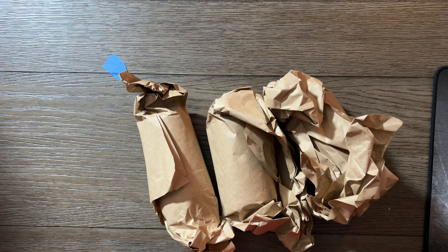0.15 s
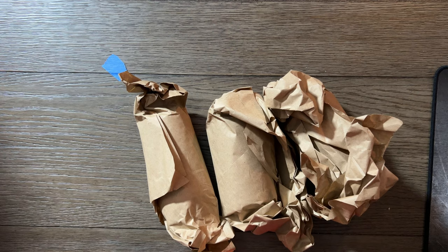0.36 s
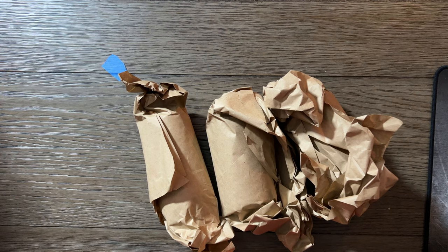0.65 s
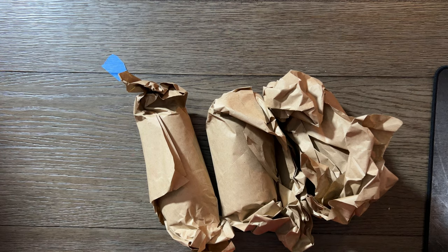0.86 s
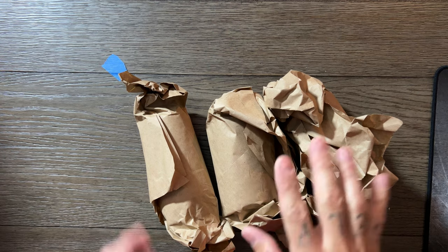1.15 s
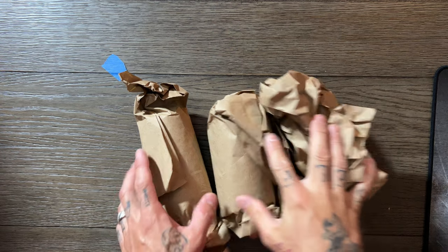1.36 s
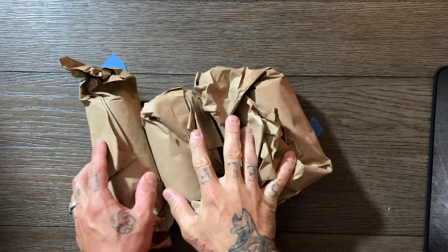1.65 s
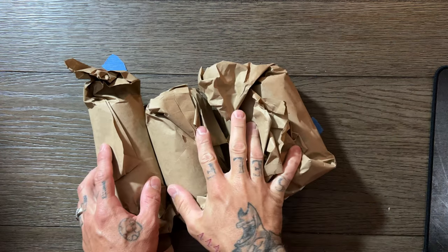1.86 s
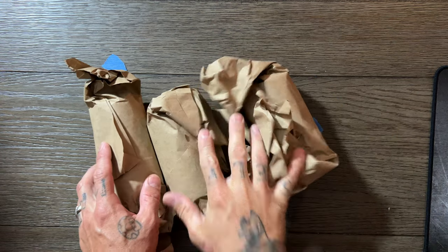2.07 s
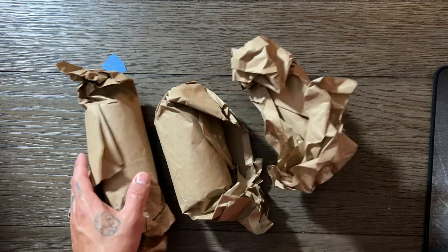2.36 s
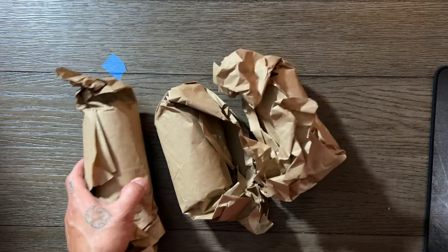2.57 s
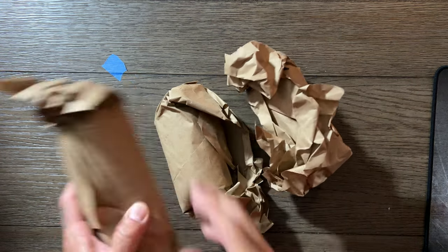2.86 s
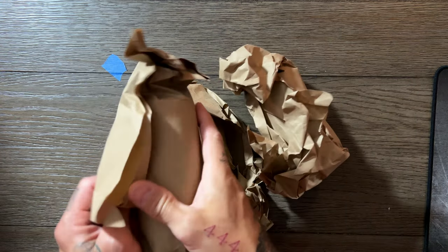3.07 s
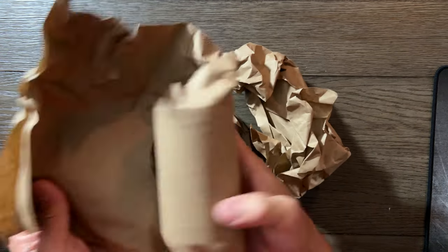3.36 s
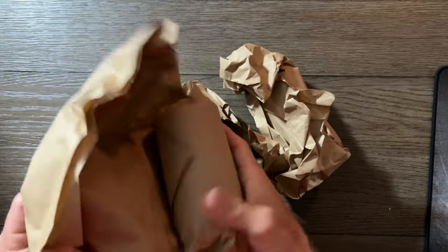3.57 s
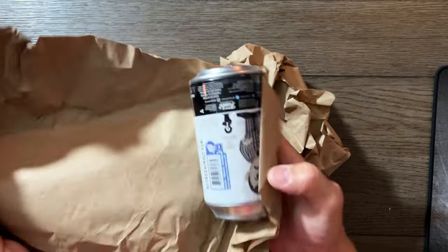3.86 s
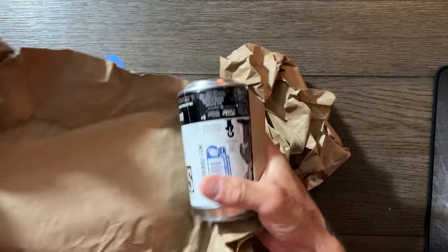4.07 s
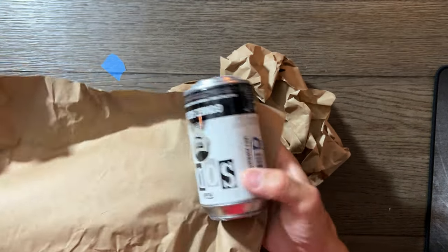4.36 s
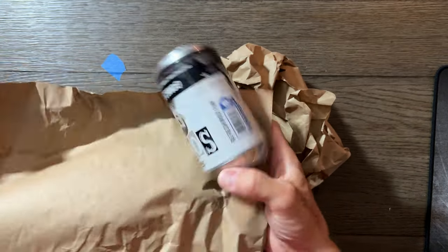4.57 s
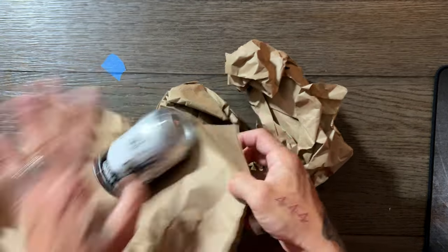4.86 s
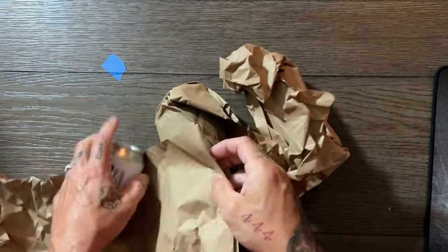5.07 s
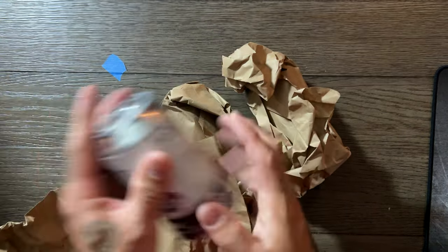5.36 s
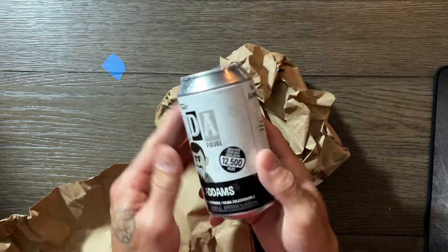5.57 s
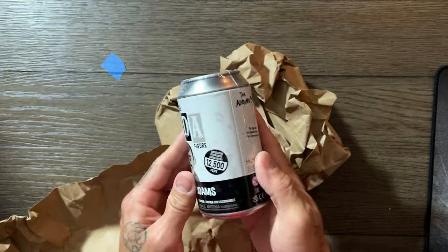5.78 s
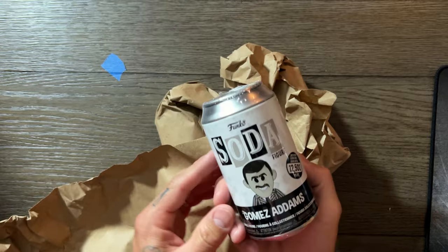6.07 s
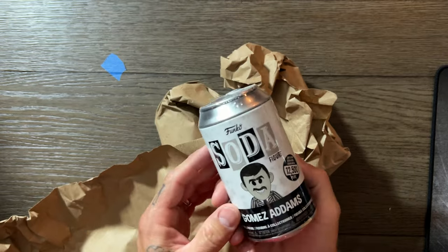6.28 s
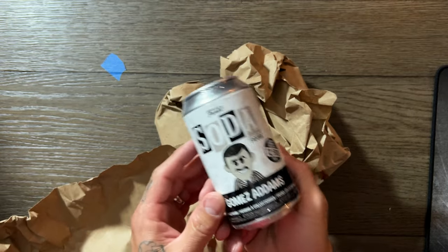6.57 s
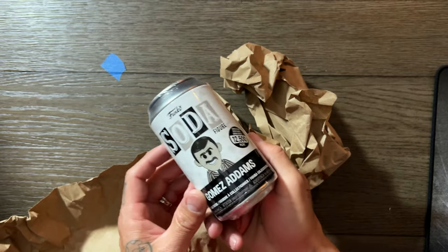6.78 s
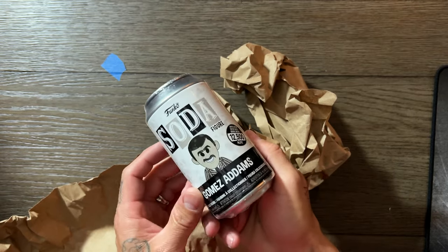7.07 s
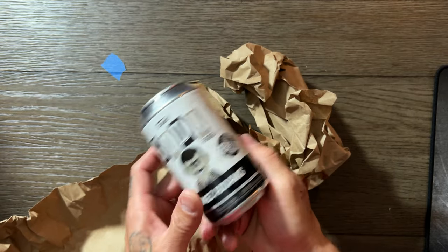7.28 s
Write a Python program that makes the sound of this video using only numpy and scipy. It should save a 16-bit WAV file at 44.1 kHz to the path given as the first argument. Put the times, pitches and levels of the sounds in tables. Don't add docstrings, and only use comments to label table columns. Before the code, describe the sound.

Stiff brown paper parcels slide and rustle on a wooden table, a sheet unrolls with loud crackling, then a tin can thumps down and rattles.

```python
import sys
import numpy as np
from scipy import signal
from scipy.fft import rfft, irfft, next_fast_len
from scipy.io import wavfile
from scipy.ndimage import uniform_filter1d, map_coordinates

SR = 44100
rng = np.random.default_rng(int(sys.argv[2]) if len(sys.argv) > 2 else 0)


def unload_audio(sound):
    columns = np.transpose(np.atleast_2d(sound))
    steps = np.round(np.clip(columns, -1, 1) * 32767)
    wavfile.write(sys.argv[1], SR, steps.astype(np.int16))


def amplitude_ratio(level_db):
    exponent = np.asarray(level_db, float) / 20
    return 10 ** exponent


N = 328104

# start t/s, rise/s, peak level/dB, 20 dB fall/s, flap re peak/dB
SETTLE_STROKES = [
    (-.6, .75, -53, .045, 2),
    (.345, .02, -63, .3, 3),
    (.4, .04, -64, .07, 0),
    (.46, .05, -70, .4, 6),
    (.574, .01, -31, .15, -6),
    (.67, .03, -46, .12, 4),
    (.78, .05, -48, .055, -2),
    (1.038, .008, -45, .13, 6),
    (1.19, .04, -49, .15, -8),
]
# start t/s, rise/s, peak level/dB, 20 dB fall/s, flap re peak/dB
PUSH_STROKES = [(1.297, .008, -41, .2, -12), (1.3, .055, -27.5, .21, -19), (1.39, .05, -35, .15, -19),
                (1.45, .08, -31, .2, -23), (1.55, .09, -33, .07, -22), (1.66, .05, -39, .2, -26),
                (1.72, .06, -39.5, .14, -26), (1.79, .04, -43, .07, -22), (1.87, .02, -50, .05, -2),
                (1.95, .04, -57, .1, 4), (2.05, .08, -39, .28, -18), (2.15, .04, -43, .15, -14),
                (2.245, .09, -45, .04, -14), (2.39, .04, -48, .2, -12), (2.47, .06, -52, .5, -2),
                (2.66, .08, -49, .3, -12), (2.76, .07, -44, .06, -16), (2.86, .08, -46, .1, -14)]
# start t/s, rise/s, peak level/dB, 20 dB fall/s, flap re peak/dB
UNROLL_STROKES = [(2.94, .05, -37, .2, -14), (2.97, .07, -34, .11, -14), (3.12, .07, -41, .3, -16),
                  (3.21, .1, -29.5, .38, -14), (3.5, .17, -42, .3, 5), (3.73, .086, -25, .14, -11),
                  (3.97, .09, -39, .3, -13), (4.12, .1, -29, .135, -13), (4.33, .03, -46, .2, -10),
                  (4.4, .03, -46, .25, -12), (4.5, .06, -46, .3, -12), (4.575, .055, -35, .3, -15),
                  (4.7, .05, -32, .3, -15), (4.795, .022, -27, .05, -14), (4.884, .006, -38, .2, -10),
                  (4.908, .01, -29, .22, -10), (5.02, .055, -42, .1, -8), (5.085, .015, -32, .16, -6),
                  (5.22, .1, -48, .07, -13)]
# start t/s, rise/s, peak level/dB, 20 dB fall/s, dry skin re peak/dB
TURN_STROKES = [(5.435, .05, -47, .08, -7), (5.53, .08, -60, .1, -3), (5.68, .05, -62, .06, 6),
                (5.76, .09, -67, .2, -12), (5.935, .03, -80, .1, 11), (6, .09, -60, .05, -10),
                (6, .03, -73, .25, 7), (6.08, .1, -75, .04, 5), (6.37, .05, -88, .1, 11),
                (6.595, .015, -92, .08, 15), (7.26, .01, -83, .3, 9), (7.3, .09, -76, .3, 13)]
# t/s, level/dB
DRAUGHT = [(.22, -59), (.33, -73), (.37, -61), (.54, -65), (1, -61), (5.5, -59), (6.2, -62), (7.44, -63)]

# t/s, peak level/dB, colour f/Hz, sheen re peak/dB
CREASES = [(1.33, -24, 2550, -20), (1.352, -20, 1930, -8), (1.367, -22, 900, -15),
           (1.392, -23, 2800, -12), (1.435, -26, 1900, -20), (1.5, -25, 900, -6),
           (1.538, -22, 2300, -8), (1.564, -26, 1800, -15), (1.68, -26, 1000, -2),
           (1.872, -40, 1500, 0), (1.891, -36, 1590, -3), (1.941, -38, 2240, -3),
           (1.979, -40, 2270, -15), (2.04, -42, 900, 0), (2.093, -31, 2800, -5), (2.14, -29, 900, -12),
           (2.38, -40, 1900, -15), (2.428, -37, 800, -20), (2.527, -38, 1300, 0),
           (2.568, -41, 1580, -5), (2.693, -38, 1200, -2), (2.734, -38, 2500, -5),
           (2.823, -33, 942, -8), (2.884, -42, 1000, 6), (2.897, -40, 1200, 3), (2.946, -33, 3500, -3),
           (3.24, -29, 1590, -5), (3.423, -24, 1290, -5), (3.44, -23, 1910, -2), (3.46, -21, 1980, -15),
               (3.51, -26, 1590, -15), (3.742, -32, 1200, 5), (3.751, -24, 800, -3), (3.79, -20, 730, -2),
               (3.82, -15, 600, -10), (3.832, -14, 1280, -10), (3.9, -25, 1500, -10), (3.94, -30, 900, -10),
               (4.047, -28, 650, -3), (4.187, -22, 1570, -10), (4.221, -18, 800, -8),
               (4.236, -19, 900, -10), (4.27, -23, 600, -15), (4.328, -30, 700, 0), (4.42, -27, 900, 0),
               (4.457, -30, 1500, -8), (4.503, -32, 1200, -8), (4.608, -28, 1640, -8),
               (5.205, -30, 1600, -5), (5.278, -37, 958, -3), (5.306, -39, 2700, -5),
           (.367, -50, 420, -25), (.408, -58, 1300, 8), (1.606, -22, 1710, -21),
                (1.663, -20, 1300, -5), (1.787, -27, 898, -1), (1.953, -26, 1200, -25),
                (2.004, -28, 2130, -36), (2.155, -28, 1900, -6), (2.184, -28, 1680, -14),
                (2.216, -28.5, 1270, -22), (2.273, -24, 2750, -14), (2.312, -25, 2210, -12),
                (2.333, -23, 1930, -8.5), (2.412, -35.5, 660, -21), (2.444, -33, 1090, -20),
                (2.495, -40, 1600, 3), (2.547, -35, 950, -20), (2.622, -27, 1230, -26),
                (2.632, -34, 1600, -8), (2.755, -36, 1900, -20), (2.837, -25.5, 1360, 2.5),
                (2.93, -38, 630, 1.5), (2.96, -32.5, 689, 12),
           (3.03, -12.5, 1800, -23), (3.076, -15.5, 1300, -6), (3.163, -26, 1670, -6),
              (3.183, -23.5, 1520, -36), (3.275, -22.5, 1810, -5), (3.286, -14.5, 1290, -7.5),
              (3.311, -12, 1590, -8), (3.333, -9.5, 985, -10), (3.355, -17, 1560, 3),
              (3.399, -29, 1270, 16), (3.52, -15, 596, -0.5), (3.541, -28, 1600, 3),
              (3.583, -21, 1920, -18.5), (3.603, -15.5, 1350, -4), (3.681, -23, 800, -27),
              (3.695, -13.5, 1561, -4), (3.721, -25, 834, -23), (3.769, -14, 1770, -8.5),
              (3.804, -17, 859, -15.5), (3.864, -12, 1170, -5), (3.973, -22, 1930, -7),
           (4.027, -28, 910, 2), (4.118, -26, 1290, -3.5), (4.143, -24, 1580, 2),
              (4.173, -19.5, 660, -2.5), (4.353, -19, 2800, -8), (4.438, -19, 2800, -3),
              (4.52, -30, 800, -3), (4.56, -38, 1300, 7), (4.586, -26.5, 2970, -9),
              (4.624, -19, 1550, -16.5), (4.668, -12, 1660, -8), (4.684, -20, 1300, -14),
              (4.736, -23, 1700, -15), (4.813, -15, 1600, -3), (4.866, -38, 1280, 8), (4.889, -24, 732, 0),
              (4.915, -9, 1000, -10), (4.952, -4.5, 1260, -16), (5.015, -30, 3800, 0),
              (5.061, -24.5, 1600, -3.5), (5.096, -9, 1500, -17), (5.139, -19, 1100, -15),
              (5.192, -27.5, 1240, -3.5), (5.243, -36, 1900, 0), (5.327, -31, 1370, -22),
              (6.726, -61, 1300, -40)]

# t/s, peak level/dB, paper slap re peak/dB, share of t60, hardness/(dB per octave)
KNOCKS = [(0.584, -9.5, -6, 0.8, 4.5), (0.5925, -12.5, -2, 1.0, -1), (0.615, -24, 0, 0.8, 3),
          (1.043, -30.5, -9, 1.2, 0), (1.228, -33.5, -3, 0.65, 0), (2.538, -43.5, -13, 0.91, 0),
          (4.892, -38, 10, 0.72, 3), (4.917, -9, -4, 0.5, -1.5), (4.954, -6.5, -10, 0.75, -.5),
          (5, -28, -21.5, 1.1, 0), (5.097, -5.5, -13, 0.4, .8), (5.139, -22, -14, .6, 0),
          (5.454, -38, 0.5, 0.37, -4)]
# t/s, peak level/dB, dull part re peak/dB, crisp edge re peak/dB
RATTLES = [(5.4485, -40, -28, -5), (5.456, -31, -16, -20), (5.488, -18, -40, -22), (5.508, -33, -18, -15),
           (5.514, -33, -25, -20), (5.587, -44, -30, -25), (5.601, -38, -12, -15),
           (5.6085, -21.5, -34, -18), (5.6244, -34, -18, -26), (5.637, -42, -28, -26),
           (5.651, -45, -25, -26), (5.662, -47, -25, -26), (6.0202, -42, -15, -11), (6.055, -52, -25, -20),
           (6.0811, -43, -14, -31), (6.0944, -59, -10, -19.5), (7.2744, -70.5, -15.5, -8)]

# f/Hz, level/dB, t60/s
EDGE_MODES = [(57.4, -14, 0.15), (104.3, 2.2, .22), (129, 2.4, 0.2), (207, -4, 0.22), (335, -10, 0.12),
              (460, -1.5, 0.041), (620, -4.5, 0.035), (1080, -14, .06)]
# f/Hz, level/dB, t60/s
CAN_DOWN_MODES = [(54, -12, .25), (100, -5, 0.25), (208, 0.5, 0.28), (280, -8, 0.2), (367.2, -7.5, 0.22),
                  (490, -2, 0.16), (668, -11, 0.04), (790, -10, .06), (960, -13, .06), (1300, -12, .03),
                  (1610, -13.5, 0.048), (1930, -11, .04), (2607, -13.5, 0.049)]
# f/Hz, level/dB, t60/s
TIN_MODES = [(1540, -8, 0.03), (1960, 1, 0.045), (2090, -3, 0.07), (2545, 1, 0.055), (2950, 9, 0.014),
             (3500, 4, 0.018), (4600, 3, .012)]

# f/Hz, density/(dB per Hz)
RUSTLE = [(400, -39.5), (800, -2), (1300, -4.8), (2000, -4.5), (3000, -6), (4500, -31.5)]
# f/Hz, density/(dB per Hz)
BODY = [(120, -16), (210, -3), (350, -3), (480, .4), (800, -5.5), (1200, -35)]
# f/Hz, density/(dB per Hz)
SHEEN = [(2200, -32.5), (3300, 2.5), (5000, -0.5), (8000, -1.5), (10500, 0), (13000, -7.4), (16000, -7.5),
         (17000, -39)]
# f/Hz, density/(dB per Hz)
FLAP = [(25, -33), (52, 5.5), (105, -3), (135, -6.5), (185, -15), (300, -48.5), (900, -85)]
# f/Hz, density/(dB per Hz)
RUBBED_TIN = [(500, -30), (1000, -14), (1550, -2), (1850, -8), (2030, 2), (2250, -8), (2550, -2),
              (4500, -20)]
# f/Hz, density/(dB per Hz)
SKIN = [(2500, -26), (4000, -2.5), (8000, -2), (14000, 1.5), (16500, -10.5)]
# f/Hz, density/(dB per Hz)
WOOD = [(90, -30), (190, -4), (560, 0), (900, -30), (1500, -70)]
# f/Hz, density/(dB per Hz)
AIR = [(100, -25), (165, -26), (215, -16), (300, -20), (730, -28), (3200, -38), (7600, -41), (16000, -54)]

# f/Hz, t60/s
ROOM = [(150, 0.23), (1500, 0.073), (10000, 0.033)]
# f/Hz, correlation/1
ALIKE = [(60, .995), (150, .96), (400, .84), (1000, .74), (2400, .5), (3700, .3), (5800, .35), (8600, .65),
         (9600, .996), (10600, .996), (11700, .72), (13000, .994), (13900, .994), (15000, .65)]
# f/Hz, phase/rad
LEAD = [(0, 0), (1700, .5), (3500, 2.4), (4600, .3), (7200, -.2), (9600, -3.14), (10500, -3.14),
        (12900, -6.28), (13900, -6.28), (15800, -8.5)]
# f/Hz, level/dB
LEFT = [(60, .3), (200, -.2), (600, 2.5), (1500, 2.6), (5000, 1.5), (9000, 0)]


def paper():
    time = np.arange(N) / SR
    settle, push, unroll = [strokes(rows) for rows in (SETTLE_STROKES, PUSH_STROKES, UNROLL_STROKES)]
    rustle, grip = settle + push + unroll, strokes(TURN_STROKES)
    body = amplitude_ratio(2.5) * settle + amplitude_ratio(-10) * push + amplitude_ratio(-3.5) * unroll + amplitude_ratio(-8) * grip
    shine = amplitude_ratio(3) * settle + amplitude_ratio(-1) * push + amplitude_ratio(.3) * unroll
    skin = strokes(TURN_STROKES, np.transpose(TURN_STROKES)[4])

    crumpling = np.interp(time, [1.7, 1.95, 5.4, 5.7], [.3, 1, 1, .3])
    chance, size_chance = rng.random((2, N))
    creases_per_s = 160 * amplitude_ratio(5 * wobble(18))
    creases = (chance < creases_per_s / SR) * size_chance ** -.26 * crumpling
    sway = amplitude_ratio(1.8 * wobble(30) * crumpling)

    def grains(t60):
        return unit(.65 * sway + .5 * unit(dying(creases, t60, t60 / 12)))

    crisp, mellow, dull = grains(.012), grains(.02), grains(.035)
    rubbed = amplitude_ratio(3) * grip * noise(RUBBED_TIN, patchy_db=3) + rustle * noise(RUSTLE, patchy_db=2.5)
    sheen = skin * noise(SKIN) + shine * noise(SHEEN, patchy_db=2.5)
    bed = mellow * rubbed + crisp * sheen + body * dull * noise(BODY)

    sheet = SETTLE_STROKES + PUSH_STROKES + UNROLL_STROKES
    draught = amplitude_ratio(np.interp(time, *np.transpose(DRAUGHT)))
    flap = np.hypot(strokes(sheet, np.transpose(sheet)[4]), draught)
    lumps = unit(amplitude_ratio(2.5 * wobble(14)))
    return amplitude_ratio(-1.5) * bed + amplitude_ratio(3.5) * flap * lumps * noise(FLAP)


def snaps():
    cracks, t = np.zeros((2, N + SR)), np.arange(SR // 24) / SR
    white, sheen = rng.standard_normal((2, N)), noise(SHEEN)
    stutter = wobble(700) ** 2 + .4
    slip_s, crack_width_s, crack_share = .001, .00015, 3
    crack = 1 + crack_share * np.exp(-((t - slip_s) / crack_width_s) ** 2)
    onset = (1 - np.exp(-t / .0009)) ** 2 * crack
    for s, db, hz, sheen_db in CREASES:
        first = round(s * SR)
        part = slice(first, first + len(t))
        start = stutter[part] * onset
        fold = signal.iirpeak(hz, 1.3, SR)
        broad = signal.lfilter(*fold, white[:, part] * start * amplitude_ratio(-60 * t / .022))
        voiced = signal.lfilter(*fold, broad) + .3 * broad
        edge = sheen[:, part] * start * amplitude_ratio(-60 * t / .018)
        cracks[:, part] += amplitude_ratio(db - 1) * (peak_one(voiced) + amplitude_ratio(sheen_db + 3.8) * peak_one(edge))
    return cracks[:, :N]


def table():
    board = np.zeros((2, N + SR))
    for s, db, _, stretch, hard_db in KNOCKS:
        modes = EDGE_MODES if s < 3 else CAN_DOWN_MODES
        blow = amplitude_ratio(db - 6) * ring(modes, stretch, hard_db)
        board[:, round(s * SR):][:, :blow.shape[1]] += blow
    s, db, slap_db, *_ = np.transpose(KNOCKS)
    slap = dying(impulses(KNOCKS, db + slap_db - 11), .04, .001) * noise(RUSTLE)
    wood_db = np.where(s > 3, db - 18, -120)
    wood = dying(impulses(KNOCKS, wood_db), .3, .004) * noise(WOOD)
    return board[:, :N] + slap + wood


def can():
    tin, t = np.zeros((2, N + SR)), np.arange(SR // 3) / SR
    click = np.sin(2 * np.pi * 2600 * t) * amplitude_ratio(-60 * t / .0023)
    for s, db, *_ in RATTLES:
        tick = ring(TIN_MODES, .9) + 9 * click * [[1], [.5]]
        tin[:, round(s * SR):][:, :len(t)] += amplitude_ratio(db + 3.5) * peak_one(tick)
    _, db, dull_db, edge_db = np.transpose(RATTLES)
    buzz = dying(impulses(RATTLES, db - 13), .034, .00018) * noise(RUSTLE)
    edge = dying(impulses(RATTLES, db + edge_db + 3.5), .015, .00036) * noise(SHEEN)
    push = dying(impulses(RATTLES, db + dull_db - 2), .03, .0004) * noise(BODY)
    return tin[:, :N] + buzz + edge + push


def room(x):
    hz, t, z = signal.stft(rng.standard_normal((2, SR // 3)), SR, nperseg=256)
    fade = amplitude_ratio(-60 * t / along(ROOM, hz)[:, None])
    tail = signal.istft(z * fade, SR, nperseg=256)[1]
    late = np.pad(x, ((0, 0), (250, 0)))
    return signal.fftconvolve(late, tail / np.linalg.norm(tail[0]), axes=1)[:, :N]


def air():
    return amplitude_ratio(-81) * noise(AIR)


def port(pair, sign):
    lead_hz, lead = np.transpose(LEAD)

    def response(hz):
        turn = np.arccos(np.clip(along(ALIKE, hz), -1, 1)) / 2
        phase = .5 * sign * np.interp(hz, lead_hz, lead)
        place = amplitude_ratio(sign * along(LEFT, hz) / 2) * np.exp(1j * phase)
        bounce = .3 / (1 + (hz / 4000) ** 2)
        flutter = 1 / (1 - bounce * np.exp(-2j * np.pi * hz / 321))
        return place * flutter * [np.cos(turn), sign * np.sin(turn)]

    return filtered(pair, response).sum(0)


def strokes(rows, extra_db=0):
    start, rise, db, fall = np.transpose(rows)[:4, :, None]
    grid = np.arange(0, N + 64, 64)
    late = grid / SR - start
    swell = np.clip(late / rise, 0, 1) ** 1.5
    fall_db = 20 * np.maximum(late - rise, 0) / fall
    gain = amplitude_ratio(db + np.c_[extra_db] - fall_db) * swell
    return np.interp(np.arange(N), grid, np.linalg.norm(gain, axis=0))


def ring(modes, stretch, hard_db=0):
    t = np.arange(SR // 3) / SR
    hz, db, t60 = np.transpose(modes)[:, :, None]
    strength, phase, detune = rng.standard_normal((3, 2, len(modes), 1))
    level_db = db + hard_db * np.log2(hz / 250) + 1.5 * strength
    swing_up = 1 - np.exp(-t * hz / .4)
    fade = amplitude_ratio(level_db - 60 * t / (t60 * stretch)) * swing_up
    tone = np.sin(2 * np.pi * hz * (1 + .008 * detune) * t + .5 * phase)
    return (fade * tone).sum(1)


def impulses(rows, db):
    first = np.round(np.array(rows)[:, 0] * SR).astype(int)
    return np.bincount(first, amplitude_ratio(db), N)[:N]


def dying(hits, t60, rise):
    t = np.arange(SR // 5) / SR
    shape = amplitude_ratio(-60 * t / t60) * (1 - np.exp(-t / rise))
    return np.abs(signal.fftconvolve(hits, shape)[:N])


def wobble(rate):
    knots = rng.standard_normal(int(N * rate / SR) + 4)
    return map_coordinates(knots, [np.arange(N) * rate / SR])


def noise(spectrum, patchy_db=0):
    pair = rng.standard_normal((2, N))
    if patchy_db:
        z = signal.stft(pair, nperseg=256)[2]
        field = uniform_filter1d(rng.standard_normal(z.shape[1:]), size=8, axis=0)
        field = uniform_filter1d(field, size=4, axis=1)
        pair = signal.istft(z * amplitude_ratio(patchy_db * unit(field)), nperseg=256)[1][:, :N]
    return unit(filtered(pair, lambda hz: amplitude_ratio(along(spectrum, hz))))


def filtered(x, response):
    m = next_fast_len(N + SR // 4)
    hz = np.fft.rfftfreq(m, 1 / SR)
    return irfft(rfft(x, m) * response(hz), m)[..., :N]


def along(points, hz):
    f, v = np.transpose(points)
    return np.interp(np.log(hz + 1), np.log(f + 1), v)


def unit(x):
    return x / np.sqrt(np.mean(x ** 2) + 1e-20)


def peak_one(pair):
    return pair / np.abs(pair[0]).max()


def scene():
    near = paper() + snaps() + table() + can()
    pair = near + amplitude_ratio(-14) * room(near) + air()
    return np.array([port(pair, sign) for sign in (1, -1)])


def band_limit(x):
    return signal.sosfilt(signal.butter(12, 16980, fs=SR, output="sos"), x)


def record(dry):
    def microphone(hz):
        bass_cut = (1j * hz / (40 + 1j * hz)) ** 3
        top_cut = np.where(hz < 16050, 1, .03)
        return bass_cut * top_cut

    mix = filtered(dry, microphone)
    return band_limit(mix)


dry = scene()
out = record(dry)
unload_audio(out)
```